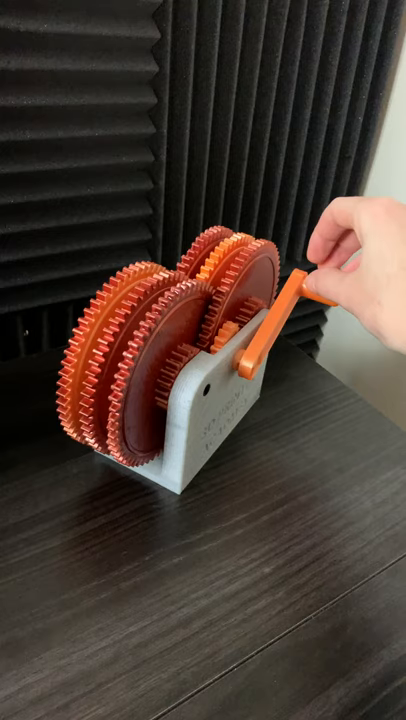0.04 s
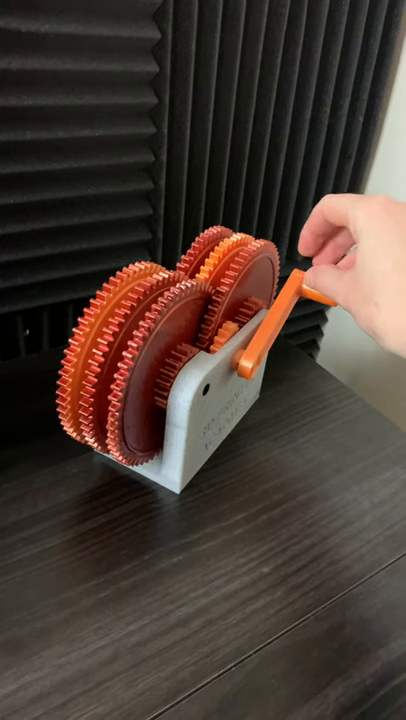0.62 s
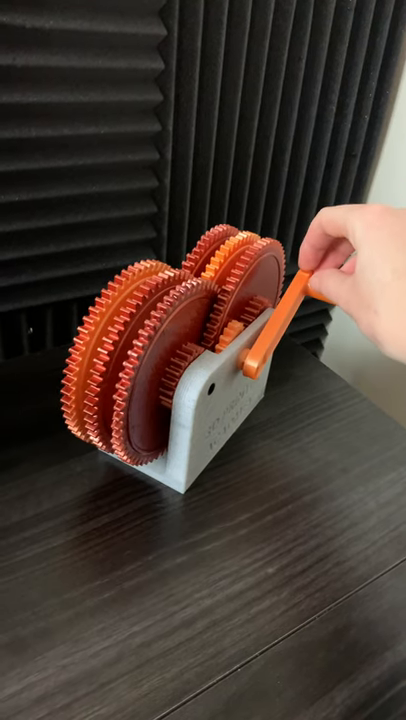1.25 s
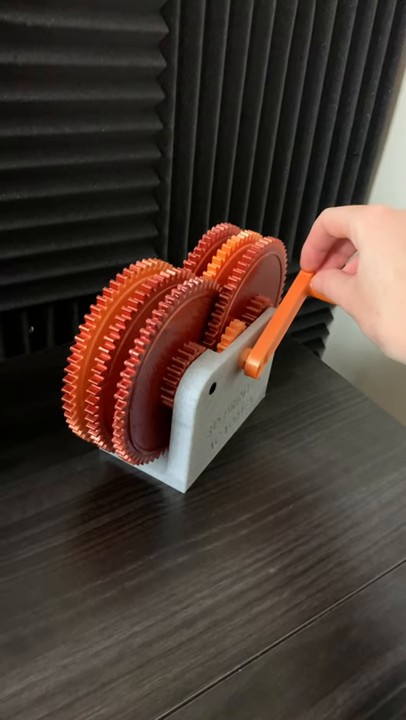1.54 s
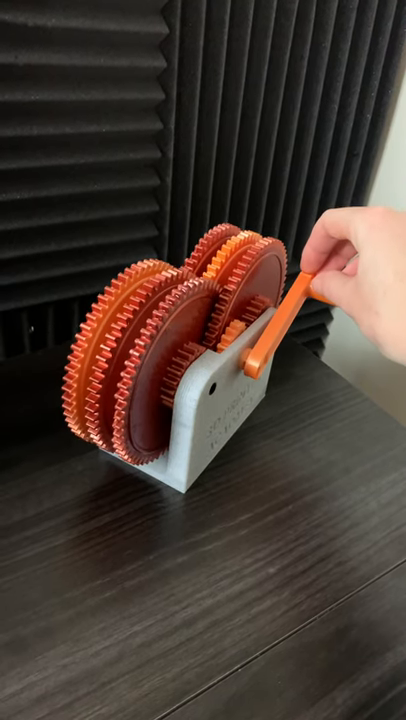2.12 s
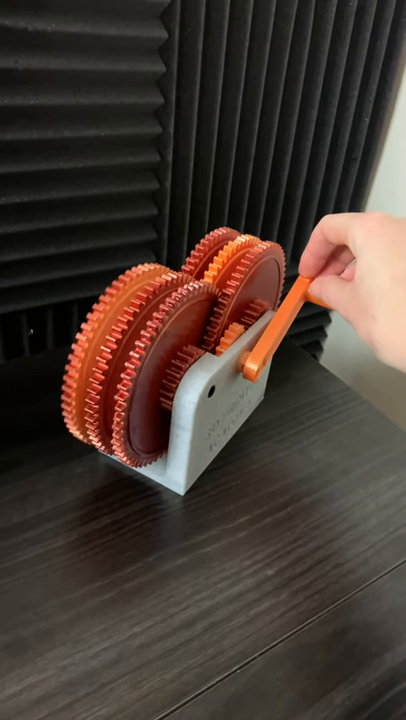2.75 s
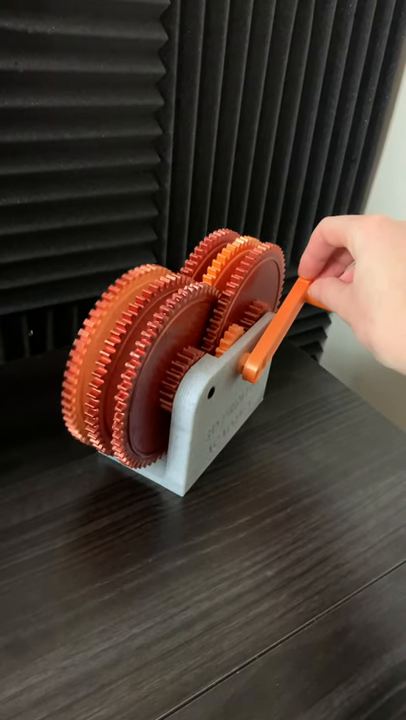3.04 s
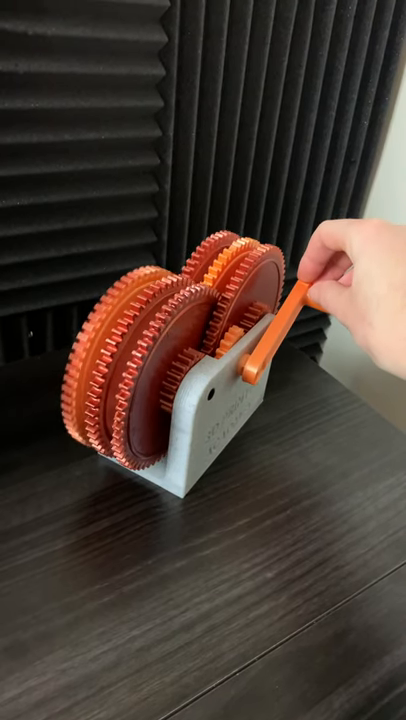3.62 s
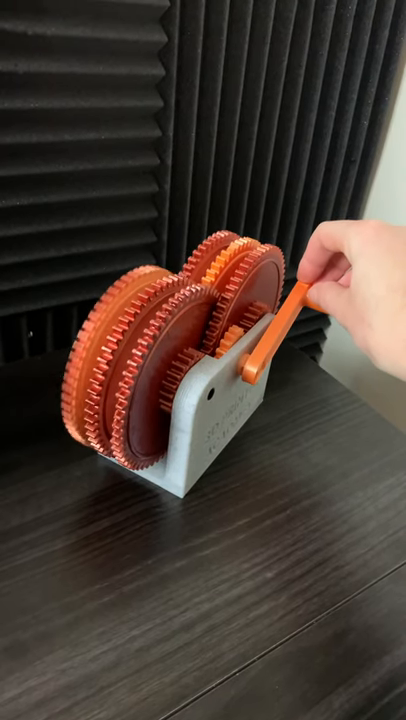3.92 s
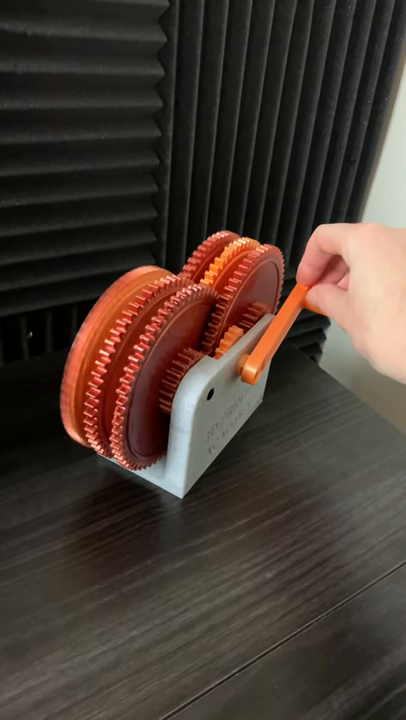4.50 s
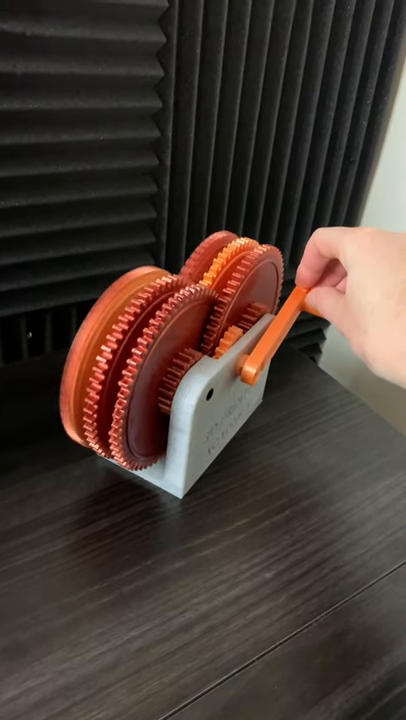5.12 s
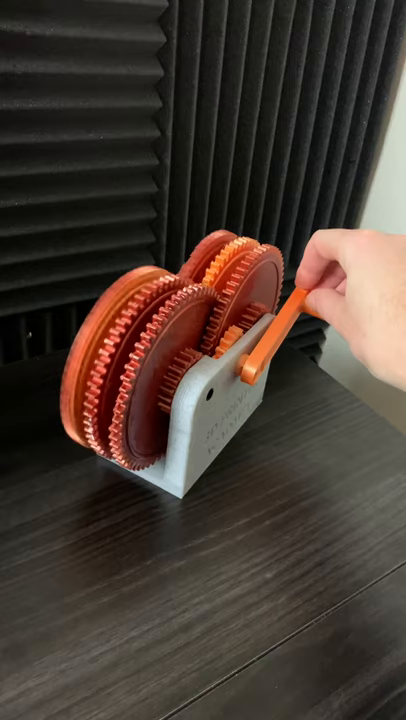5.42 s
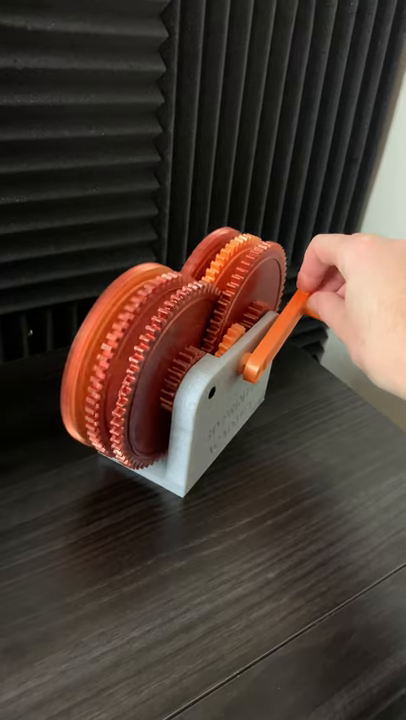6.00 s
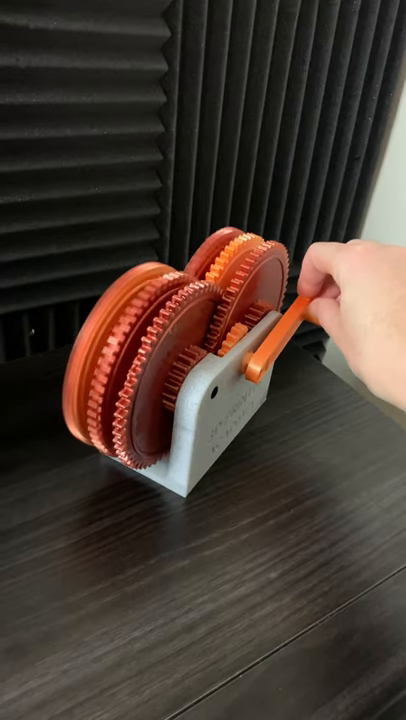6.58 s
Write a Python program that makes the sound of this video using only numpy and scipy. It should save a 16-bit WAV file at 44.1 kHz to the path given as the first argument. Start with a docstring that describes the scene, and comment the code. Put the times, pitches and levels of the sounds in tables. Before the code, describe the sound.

A few soft ticks from plastic gears on a table build into a low whir with rapid clicks, a sharp crack and rasping.

```python
"""First comes the low hum of a small room, with a faint rustle and a few ticks close to the microphone:
a hand crank is starting a train of plastic gears on a table. Their stand rocks once. As they gather
speed the mesh whirs and grinds, and the teeth knock across their play about forty times a second; some
catch hard or crack, and near the end the wobbling faces brush each other. Each knock rings the frame,
the gear discs, their rims and the teeth. A two-port stereo microphone hears it with a short room tail."""
import sys
import numpy as np
from scipy import signal
from scipy.fft import rfft, irfft, next_fast_len
from scipy.io import wavfile

SR = 44100
rng = np.random.default_rng(int(sys.argv[2]) if len(sys.argv) > 2 else 0)


def to_wav(s):
    """Save 16-bit WAV."""
    ch = np.atleast_2d(s).T  # columns
    pcm = np.round(np.clip(ch, -1, 1) * 32767)  # PCM
    wavfile.write(sys.argv[1], SR, pcm.astype(np.int16))


N = 297675
TIME = np.arange(N) / SR
PADDED = next_fast_len(N + SR // 10, True)
FREQ = np.fft.rfftfreq(PADDED, 1 / SR)


def undb(db):
    """Decibels to gain."""
    return 10 ** (np.asarray(db) / 20)


def unit(x):
    """Scale to rms 1."""
    return x / np.sqrt(np.mean(x ** 2))


def contour(points):
    """Rows of f/Hz, level/dB as a gain at every frequency."""
    hz, db = np.transpose(points)
    return undb(np.interp(np.log(FREQ + 1), np.log(hz), db))


def colour(x, gain):
    """Filter by a gain at every frequency, padded so the ring can die away."""
    return irfft(rfft(x, PADDED) * gain, PADDED)[..., :N]


def add(track, start_s, sound):
    """Mix a sound into a track at a given time."""
    i = max(int(start_s * SR), 0)
    track[i:i + len(sound)] += sound[:max(N - i, 0)]


def blend(share, gentle, hard):
    """Equal-power passage from one texture to another."""
    return np.sqrt(1 - share) * gentle + np.sqrt(share) * hard


def flutter(per_s, depth_db):
    """A gain that wanders at random as unevenly shaped teeth come and go."""
    knots = np.arange(0, TIME[-1] + 1, 1 / per_s)
    return unit(undb(depth_db * np.interp(TIME, knots, rng.standard_normal(len(knots)))))


def ring(modes, scatter_db, detune, tilt_db=0, build_cycles=0.38):
    """One contact's ring: where it lands sets how each mode answers, its hardness tilts them."""
    hz, width, db = np.transpose(modes)[:, :, None]
    t = TIME[:SR // 8]
    strength, shift = rng.standard_normal((2, len(modes), 1))
    sign = rng.choice([-1, 1], (len(modes), 1))
    octaves = np.clip(np.log2(hz / hz.mean()), -.5, 1)
    size = sign * width * undb(db + scatter_db * strength + tilt_db * octaves)
    swell = (1 - np.exp(-t * hz / build_cycles)) ** 2  # a mode takes time to spread through the part
    decay = np.exp(-np.pi * width * t)
    return np.sum(size * swell * decay * np.sin(2 * np.pi * hz * (1 + detune * shift) * t), axis=0)


def grains(modes, per_s, spread_db, tilt_db, places=8):
    """Dense little contacts of uneven size, at several places round the gears; rms 1."""
    out = np.zeros(N)
    for _ in range(places):
        hits = rng.random(N) < per_s / places / SR
        sizes = undb(spread_db * np.clip(rng.standard_normal(N), -2, 2))
        signs = rng.choice([-1, 1], N)
        response = ring(modes, scatter_db=4, detune=0.015, tilt_db=tilt_db)
        out += signal.oaconvolve(hits * sizes * signs, response)[:N]
    return unit(out)


# Room tone all round the microphone: f/Hz, relative density/dB
ROOM_TONE = [(20, -111), (40, -96.5), (55, -79), (90, -81), (200, -88.5), (300, -99), (450, -99),
             (650, -104), (930, -107), (1300, -115), (2400, -124), (4000, -124), (5300, -132), (8500, -123),
             (10500, -126), (12500, -139), (15000, -133)]
# Its stereo width: f/Hz, side minus mid/dB
ROOM_WIDTH = [(60, -23.5), (110, -11), (200, -8.5), (380, 0), (700, 5), (1290, 5.5), (2380, 3), (4400, 4.5),
              (8120, -9.5), (15000, 11.5)]
# The room's hum, in the middle of the image: f/Hz, width/Hz, level/dB
HUM_BANDS = [(62.5, 4.1, -62.5), (71, 7.5, -61), (119.3, 2.1, -68.5), (151, 17, -66), (160.2, 1.5, -65.5),
             (239.3, 1, -76.5)]
def room_tone(noise_db=-72):
    """Steady, wide room noise with a low, wavering hum of narrow noise bands."""
    shape = contour(ROOM_TONE)
    shape /= np.sqrt(np.mean(shape ** 2 * (FREQ > 250)))  # noise_db counts the part above 250 Hz
    mid = undb(noise_db) * colour(rng.standard_normal(N), shape)
    side = undb(noise_db) * colour(rng.standard_normal(N), shape * contour(ROOM_WIDTH))
    for hz, width, db in HUM_BANDS:
        band = 1 / (1 + (2 * (FREQ - hz) / width) ** 2)
        mid += undb(db) * unit(colour(rng.standard_normal(N), band))
    return np.array([mid + side, mid - side])


# What the table and walls send back to the microphone: f/Hz, level against the direct sound/dB
ROOM_RETURN = [(150, -32), (450, -1.5), (1100, -5), (2200, -3), (4000, -13), (5200, -15), (8000, -3),
               (14000, -20)]
def reflections(x, t60_s=0.17, gap_s=0.0024):
    """A short, dry tail from the table and padded walls, different at each microphone port."""
    t = TIME[:SR // 2]
    onset = np.clip(t / gap_s - 1, 0, 1)
    tail = rng.standard_normal((2, len(t))) * undb(-60 * t / t60_s) * onset
    tail /= np.linalg.norm(tail, axis=1, keepdims=True)
    return signal.oaconvolve(colour(x, contour(ROOM_RETURN))[None], tail, axes=1)[:, :N]


# Phase between the microphone's ports: f/Hz, left lead/rad
MIC_PHASE = [(0, 0), (520, -.4), (1200, -.1), (1900, .5), (2800, 1.3), (3700, 2), (5200, 3.1), (7700, 6.1),
             (9600, 6.5), (11500, 8.8), (13500, 9.8), (14600, 11.5), (16000, 12.6)]
# Balance between them: f/Hz, left minus right/dB
MIC_BALANCE = [(200, -1), (380, -1.5), (700, -7), (1300, -1.5), (4400, -1.5), (8000, 0.5)]
def microphone(x):
    """Direct sound from close by reaches the two ports with different phase and strength."""
    lead = np.interp(FREQ, *np.transpose(MIC_PHASE))
    left = np.sqrt(contour(MIC_BALANCE)) * np.exp(.5j * lead)
    return colour(x, np.array([left, 1 / left]))


# Resonances of the sliding tooth flanks: f/Hz, width/Hz, level/dB
FLANK_MODES = [(453, 110, -3), (878, 85, -0.5), (978, 45, 1.5), (1038, 38, -5), (1346, 63, -6),
               (1575, 120, -9), (1795, 140, -17.5)]
# Their rustle, faint even close up: t/s, level/dB
RUSTLE_LEVEL = [(0, -87), (.22, -73.5), (.64, -74), (.73, -78), (.85, -73), (1.15, -74), (1.42, -72),
                (1.62, -76), (2.0, -73.5), (2.42, -78), (2.73, -73.5), (2.92, -76.5), (3.15, -74),
                (3.7, -75), (4.0, -74)]
# Its bright part: t/s, level against the dull part/dB
RUSTLE_BRIGHTNESS = [(0, -4), (.72, -4.5), (.8, 3), (.97, -3.5), (1.08, -5.5), (1.39, 0), (1.48, -13),
                     (2.4, -2), (4, -3.5)]
def flank_rustle():
    """Slowly turning flanks drag over each other; a dull and a bright patch come and go."""
    dull = flutter(per_s=20, depth_db=3) * grains(FLANK_MODES, per_s=700, spread_db=4, tilt_db=-10)
    bright = flutter(per_s=26, depth_db=2.8) * grains(FLANK_MODES, per_s=500, spread_db=4, tilt_db=0)
    share = undb(np.interp(TIME, *np.transpose(RUSTLE_BRIGHTNESS)))
    level = undb(np.interp(TIME, *np.transpose(RUSTLE_LEVEL)))
    return level * unit(dull + share * bright)


# Modes of the stand on the table: f/Hz, width/Hz, level/dB
STAND_MODES = [(376, 38, 5), (437, 53, -3), (679, 61, -5.5), (797, 80, -7), (1064, 51, -21.5)]
def stand_tock(start_s=3.3065, level_db=-38.5, damp_s=0.025):
    """The stand rocks once on the table: one soft, hollow blow, soon damped as it settles."""
    out = np.zeros(N)
    sound = ring(STAND_MODES, scatter_db=0.5, detune=0.0028, build_cycles=0.9)
    sound /= 1 + (TIME[:len(sound)] / damp_s) ** 4
    add(out, start_s, undb(level_db) * sound / np.std(sound[:SR // 80]))
    return out


# The mesh running up, close to the microphone: t/s, frame whir/dB, grinding/dB (relative levels)
MESH_LEVELS = [(2.4, -78, -98), (3.17, -64.5, -77), (3.63, -64, -88), (4.281, -57.5, -80),
               (4.45, -53, -70.5), (4.78, -53, -66.5), (4.87, -49, -66.5), (5.099, -42, -57.5),
               (5.45, -49, -58.5), (5.66, -45, -55.5), (5.8, -44, -56.5), (6.22, -40, -57),
               (6.461, -36.5, -48), (6.75, -43.5, -56.5)]
def mesh_levels(s):
    """Whir and grinding of the mesh at given times, in dB."""
    times, whir, grind = np.transpose(MESH_LEVELS)
    return np.interp(s, times, whir, left=-100), np.interp(s, times, grind, left=-100)


def speed(s, still_db=-72, full_db=-42):
    """How fast the train runs, 0-1, as told by its whir."""
    whir, _ = mesh_levels(s)
    return np.clip((whir - still_db) / (full_db - still_db), 0, 1)


# Modes of the frame on the table, the gear discs and their rims: f/Hz, width/Hz, level/dB
FRAME_MODES = [(158.8, 18.4, -2), (202, 9.7, 2.5), (252, 18, 0.5), (295, 18, -5.5), (354, 19.8, 2),
               (391.7, 28.4, -0.5), (436, 52, -10), (484.8, 64, 1.5), (550, 27, -0.5), (637, 36, -2),
               (683, 63, -2.5), (746, 95, -4.5), (868, 85, -11.5)]
DISC_MODES = [(883, 130, -10.5), (1080.4, 58, 4.5), (1139, 66, 2), (1188, 79, -7), (1457, 200, -17.5)]
RIM_MODES = [(1510, 140, -6.5), (1780, 146, 3), (1930, 123, -0.5), (2180, 23, -13), (2440, 220, -4),
             (2796, 47, 0.5), (3350, 120, -7), (3820, 700, -5), (4260, 400, -10.5)]
def rolling_mesh(whir_db=-2, disc_db=-6.5, rim_db=-13, harsh_db=-56, range_db=16):
    """Rolling teeth: a low whir that grows with speed and roughens into brighter grinding."""
    whir, grind = mesh_levels(TIME)
    harshness = np.clip(0.5 + (grind - harsh_db) / range_db, 0, 1)
    frame = blend(speed(TIME), grains(FRAME_MODES, per_s=520, spread_db=-0.5, tilt_db=-25.5),
                  grains(FRAME_MODES, per_s=900, spread_db=5, tilt_db=-4.5))
    discs = grains(DISC_MODES, per_s=900, spread_db=4.5, tilt_db=-0.5)
    rims = blend(harshness, grains(RIM_MODES, per_s=490, spread_db=-2, tilt_db=0.5),
                 grains(RIM_MODES, per_s=2400, spread_db=2, tilt_db=10))
    grinding = undb(disc_db) * discs + undb(rim_db) * rims
    return flutter(per_s=35, depth_db=0.5) * (undb(whir + whir_db) * frame + undb(grind) * grinding)


# Resonances of the scraping gear faces: f/Hz, width/Hz, level/dB
FACE_MODES = [(5950, 450, -7), (7220, 315, 2.5), (8300, 540, -10), (9600, 990, -20)]
# A face brushes its neighbour: t/s, length/s, rasp/dB, hiss/dB
FACE_RUBS = [(5.906, 0.063, -52.5, -65), (5.994, .215, -51, -63.5), (6.699, 0.011, -47, -58),
             (6.725, .03, -49, -46)]
def face_rub(disc_db=-5, attack_s=0.0064, release_s=0.016):
    """At speed the wobbling faces brush each other with a gritty rasp that swells, holds and dies."""
    hiss = grains(FACE_MODES, per_s=1200, spread_db=0, tilt_db=-7)
    rims = grains(RIM_MODES, per_s=3000, spread_db=3.5, tilt_db=4.5)
    discs = grains(DISC_MODES, per_s=2400, spread_db=3.5, tilt_db=-5)
    rasp = (rims + undb(disc_db) * discs) * flutter(per_s=120, depth_db=3)
    hiss *= flutter(per_s=100, depth_db=5)
    out = np.zeros(N)
    for start, length, rasp_db, hiss_db in FACE_RUBS:
        attack = np.clip((TIME - start) / attack_s, 0, 1)
        release = np.exp(-np.maximum(TIME - start - length, 0) / release_s)
        out += attack * release * (undb(rasp_db) * rasp + undb(hiss_db) * hiss)
    return out


def backlash(contacts, dip_db=-13, flight_s=0.0063):
    """While a tooth flies across its play nothing rolls, so the mesh dips around each knock."""
    flying = np.zeros(N)
    for s, *_ in contacts:
        add(flying, s - flight_s, np.hanning(int(2.17 * flight_s * SR)))
    return undb(dip_db * np.minimum(flying, 1))


# Teeth that catch: t/s, frame thud/dB, disc ring/dB, rim clack/dB, tooth snap/dB (relative levels)
CATCHES = [(1.747, -66, -55, -74, -89), (2.561, -63, -53.5, -74.5, -93.5),
           (3.238, -76.0, -63.5, -91, -95.5), (3.306, -60, -66, -74, -81), (3.892, -58.5, -77, -88, -95.0),
           (3.965, -57.5, -76, -82, -96.0), (4.309, -53, -77, -84, -97.5), (4.353, -50, -65, -84, -96.0),
           (4.4041, -45, -53.5, -73, -87), (4.4436, -45.5, -58, -73, -84), (4.489, -49.5, -60.5, -80, -85),
           (4.573, -51.0, -63, -75, -92), (4.685, -54, -65.5, -82, -91), (4.8328, -43.5, -59.5, -67.0, -91),
           (4.86, -45.5, -74, -74, -90), (4.88, -47.5, -81, -86.5, -90), (4.901, -47, -79, -79, -95.0),
           (4.928, -44.5, -77, -88, -94.5), (4.955, -41.5, -72, -73, -91), (4.986, -51, -83.0, -80, -94.0),
           (5.003, -43, -75, -80.0, -94.0), (5.033, -41.5, -66, -73, -93.0),
           (5.057, -45.5, -73, -65.5, -94.5), (5.079, -41.0, -73, -77, -94.5),
           (5.111, -40.5, -63, -66, -93.5), (5.1236, -38.5, -58, -59, -79),
           (5.153, -38.5, -55.5, -64, -93.5), (5.1714, -36.5, -47, -55, -80.5),
           (5.216, -40, -55, -63.5, -91), (5.2338, -40.5, -49, -63, -89), (5.2802, -33, -44.5, -56, -71),
           (5.3039, -32, -41.5, -39, -42.5), (5.326, -35, -44, -55, -76), (5.3449, -32.5, -57, -51.5, -73),
           (5.3661, -48, -45, -66, -87.0), (5.3835, -44, -57, -53.5, -85), (5.405, -46.5, -44, -60, -92.5),
           (5.4243, -44, -44, -56, -86), (5.4471, -41, -45.5, -59.5, -85), (5.474, -39, -45, -53, -82),
           (5.504, -39, -48, -51, -75), (5.529, -37, -49, -58, -88), (5.5406, -41.5, -55.5, -63, -93.0),
           (5.582, -36.5, -46, -55, -67.5), (5.597, -38, -46, -56, -73), (5.6134, -35, -49, -62, -76),
           (5.6438, -41, -51, -62, -75), (5.6619, -35.5, -47, -53, -90), (5.679, -32, -51, -60, -88.0),
           (5.7023, -35.5, -46.5, -49.5, -68.0), (5.7249, -35.5, -44, -54, -73),
           (5.7517, -39, -45.5, -61, -93), (5.7747, -42, -46, -60, -80), (5.8001, -46.5, -44.5, -57, -72),
           (5.8279, -37, -44.0, -51, -60.5), (5.8585, -32, -35.5, -43, -59),
           (5.866, -40.5, -40.5, -63, -50), (5.9597, -36.5, -51, -50.5, -57),
           (5.9825, -40.0, -71, -58, -71), (5.999, -33.5, -41.5, -47.0, -61.0),
           (6.0345, -40, -53, -57, -61), (6.0531, -29.5, -40.5, -42.5, -46), (6.079, -30, -37, -47, -66),
           (6.1059, -28.0, -38, -42.5, -67), (6.138, -45, -43, -56, -76), (6.1817, -31, -36, -43.5, -65),
           (6.2049, -32, -38.5, -46.5, -60), (6.228, -39, -42, -60, -77), (6.257, -35.5, -38, -48.5, -61),
           (6.2792, -33.5, -35.5, -45, -61.5), (6.3023, -32, -35.5, -43.5, -58),
           (6.3265, -32, -37.5, -44.5, -66), (6.3514, -35.5, -46, -49.5, -68),
           (6.3677, -41, -50, -54.5, -75.5), (6.4006, -37.5, -55.0, -52.5, -67),
           (6.4219, -38, -42, -57, -72), (6.432, -37, -47, -57.5, -77.0), (6.4502, -37.5, -42.5, -52, -75),
           (6.48, -41.5, -51, -58.0, -78), (6.51, -41, -48.5, -81, -89), (6.5474, -34.5, -42, -57.0, -66),
           (6.568, -31.0, -45.5, -47, -57), (6.5967, -34.0, -48, -56, -69),
           (6.6595, -37.5, -66.0, -54.5, -67), (6.6847, -31.5, -43.5, -54, -64),
           (6.692, -31.5, -45, -61, -68), (6.7037, -49, -67.5, -52.5, -52.5), (6.716, -37.5, -55, -67, -60),
           (6.739, -31, -47, -41, -48.5)]
# Pace of the freely running gears: t/s, teeth per second
TOOTH_RATE = [(4.2, 36.5), (4.47, 36.6), (4.67, 40.3), (5.4, 45.2), (5.93, 39.7), (6.22, 40.2),
              (6.74, 35.0)]
def tooth_contacts(free_run_s=4.3, thud_db=-1.5, ring_db=4, clack_db=-8, snap_db=-24,
                   loaded_db=-56, easing=1.7, uneven_db=0.9, jitter_s=0.0007):
    """The catching teeth and, once the gears run freely, a steady beat between; rows as in CATCHES."""
    caught = [row[0] for row in CATCHES if row[0] > free_run_s]
    times = []
    for start, end in zip(caught, caught[1:]):
        rate = np.interp((start + end) / 2, *np.transpose(TOOTH_RATE))
        teeth = max(round((end - start) * rate), 1)
        times.extend(np.linspace(start, end, teeth + 1)[1:-1])
    late, force = rng.standard_normal((len(times), 2)).T
    whir, grind = mesh_levels(times)  # the beat is as hard as the mesh is running
    thud = whir + thud_db + uneven_db * force
    slack_db = easing * np.maximum(loaded_db - grind, 0)  # lightly loaded teeth thud but hardly clack
    disc = grind + ring_db - slack_db + uneven_db * force
    beat = np.column_stack([times + jitter_s * late, thud, disc, disc + clack_db, disc + snap_db])
    return np.vstack([CATCHES, beat])


def blow(modes, tilt_db, chatter, contact_s, damp_s, build_cycles=0.38, scatter_db=0.35):
    """A push and the chatter of ridged flanks ring a part until the next teeth damp it."""
    t = TIME[:SR // 20]
    push = rng.standard_normal(len(t)) * np.exp(-t / contact_s)
    push *= chatter / np.linalg.norm(push)
    push[0] += 1
    response = ring(modes, scatter_db, detune=0.013, tilt_db=tilt_db, build_cycles=build_cycles)
    sound = signal.fftconvolve(push, response)
    sound /= 1 + (TIME[:len(sound)] / damp_s) ** 2
    return sound / np.std(sound[:SR // 125])  # rms 1 over the first 8 ms


# Modes of the teeth, the brightest sound at the microphone: f/Hz, width/Hz, level/dB
TOOTH_MODES = [(4100, 500, -1), (5930, 740, 8.5), (6900, 1600, 8.5), (7600, 720, -9), (9680, 990, -3),
               (10800, 440, -9.5), (12400, 610, -7.5), (13900, 1200, -20)]
def tooth_knocks(contacts, firm_db=-41, hard_db=-50, crack_db=-57):
    """Teeth cross their play and hit: tooth and rim sound at once, the frame thuds, the discs follow."""
    out = np.zeros(N)
    for s, thud_db, disc_db, clack_db, snap_db in contacts:
        slowness = 1 - speed(s)
        frame_tilt = 2 - 0.13 * (thud_db - firm_db) - 5 * slowness  # heavy or slow blows sound deeper
        rim_tilt = 0.34 * min(clack_db - hard_db, 5)  # gentle contacts spare the high modes
        tooth_tilt = 0.85 * max(snap_db - crack_db, -5)  # a jumping tooth cracks up into the treble
        slip_s = 0.0014 if snap_db > crack_db else 0.003  # a crack is over at once, a gentler tooth scuffs
        linger = 1 + 1.7 * slowness  # slow, unloaded parts answer sooner and ring longer
        thud = blow(FRAME_MODES, frame_tilt, chatter=0.39, contact_s=0.0032, damp_s=0.02 * linger,
                    build_cycles=0.56, scatter_db=2)
        disc = blow(DISC_MODES, 0, chatter=0.091, contact_s=0.003, damp_s=0.018, build_cycles=2 / linger)
        clack = blow(RIM_MODES, rim_tilt, chatter=2.16, contact_s=0.0031 * linger, damp_s=0.012 * linger)
        snap = blow(TOOTH_MODES, tooth_tilt, chatter=2.2, contact_s=slip_s, damp_s=0.019)
        add(out, s, undb(thud_db - 0.5) * thud + undb(disc_db - 0.55) * disc)
        add(out, s, undb(clack_db + 0.1) * clack + undb(snap_db - 1.2) * snap)
    return out


def scene(tone_balance_db=-0.75, tock_room_db=-5):
    """The gear train on the table close to the microphone, with reflections and room tone behind it."""
    background = room_tone() * undb(tone_balance_db * np.array([[.5], [-.5]]))
    rolling = rolling_mesh()
    sliding = flank_rustle() + face_rub()
    stand = stand_tock()
    contacts = tooth_contacts()
    # The faces go on rubbing while a tooth flies.
    gears = tooth_knocks(contacts) + backlash(contacts) * rolling + sliding
    return microphone(gears + stand) + reflections(gears + undb(tock_room_db) * stand) + background


def record(dry, top_hz=15800):
    """The recorder cuts the highest treble."""
    return signal.sosfilt(signal.ellip(8, .2, 70, top_hz, fs=SR, output="sos"), dry)


dry = scene()
out = record(dry)
to_wav(out)
```